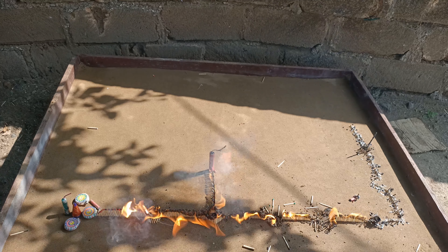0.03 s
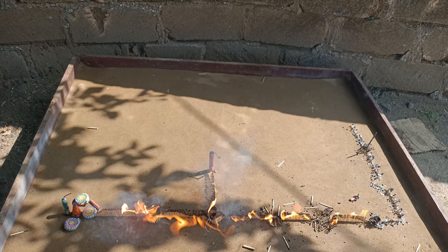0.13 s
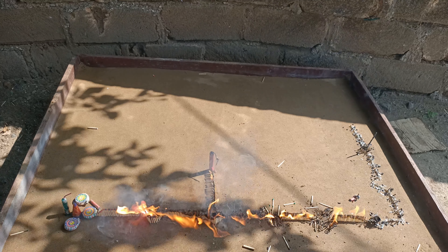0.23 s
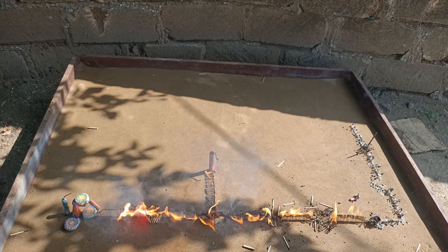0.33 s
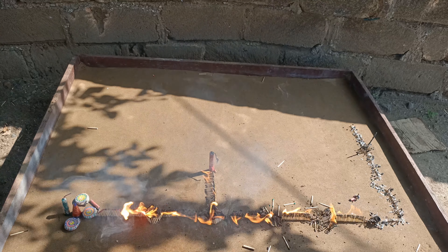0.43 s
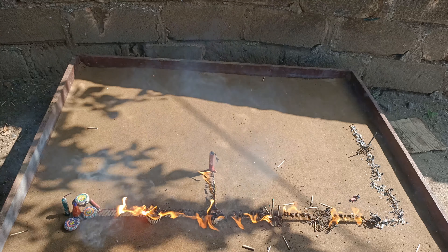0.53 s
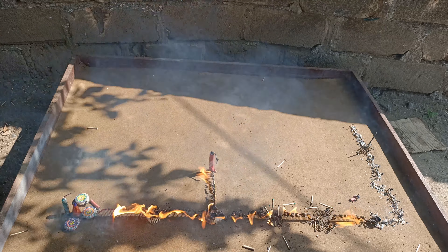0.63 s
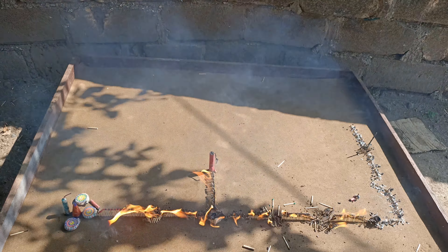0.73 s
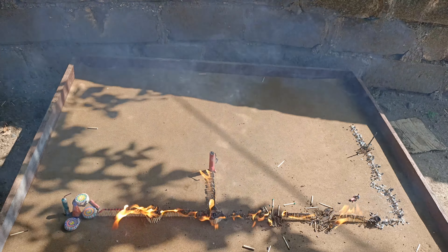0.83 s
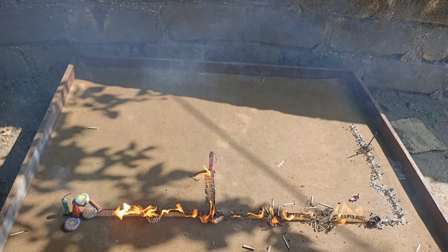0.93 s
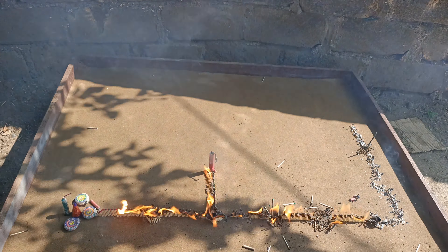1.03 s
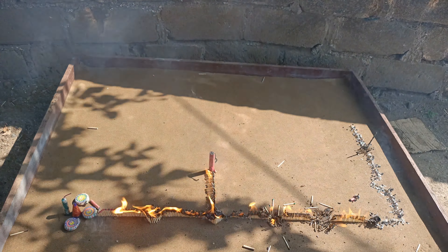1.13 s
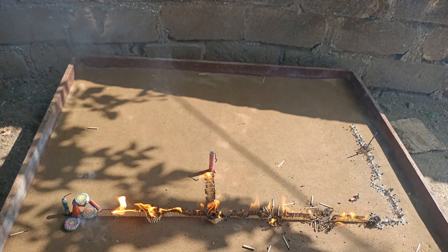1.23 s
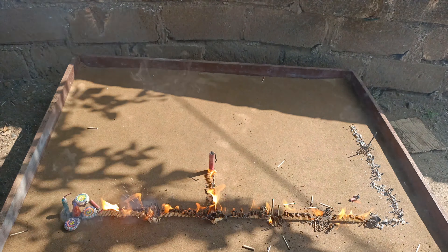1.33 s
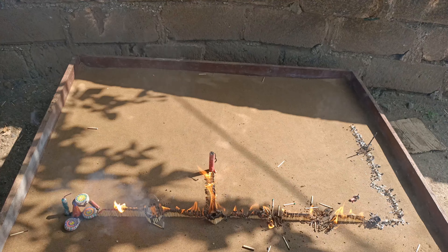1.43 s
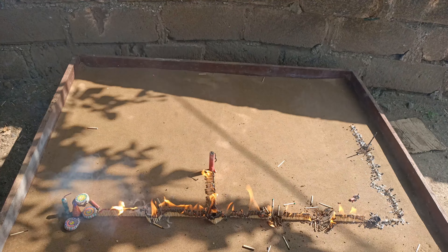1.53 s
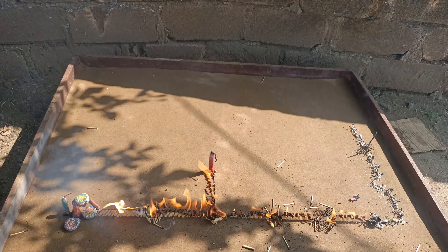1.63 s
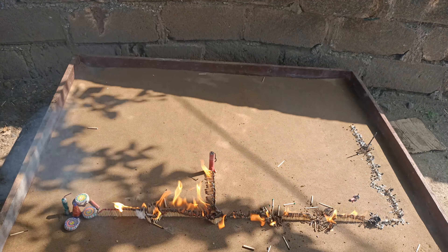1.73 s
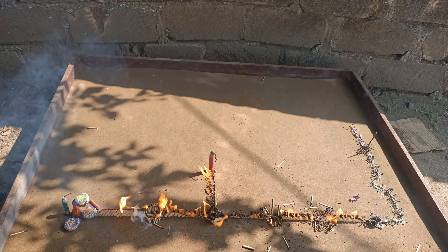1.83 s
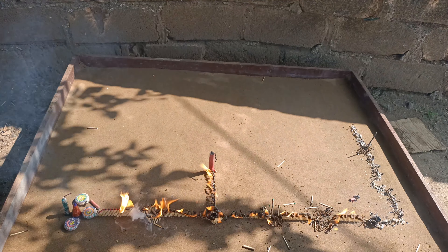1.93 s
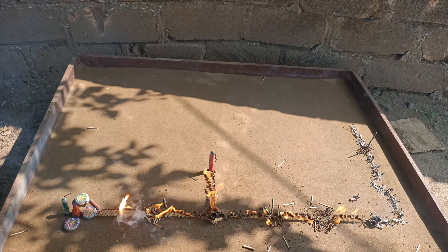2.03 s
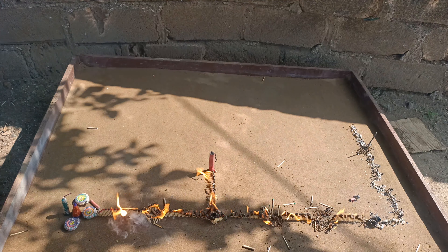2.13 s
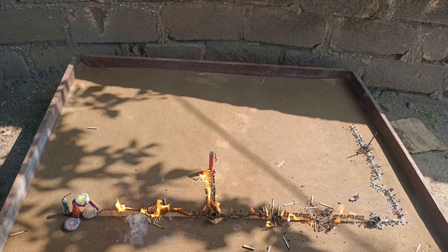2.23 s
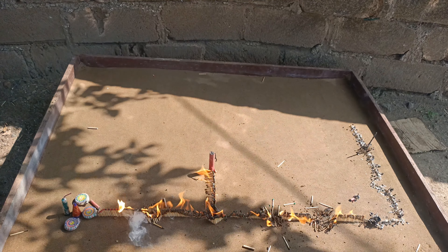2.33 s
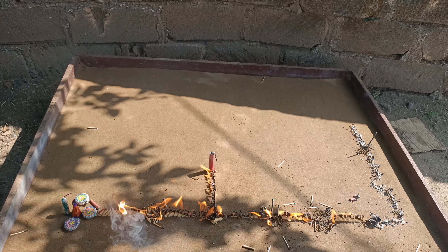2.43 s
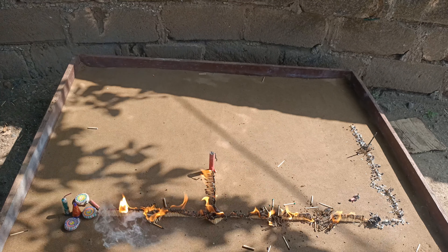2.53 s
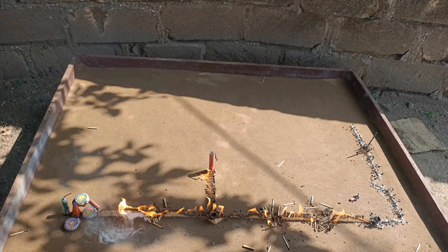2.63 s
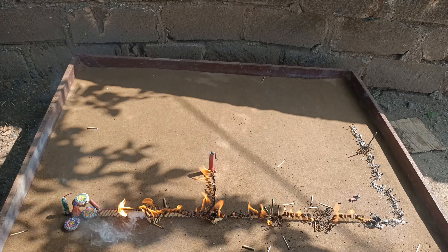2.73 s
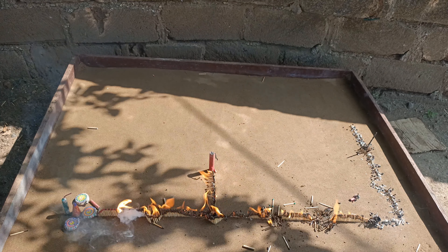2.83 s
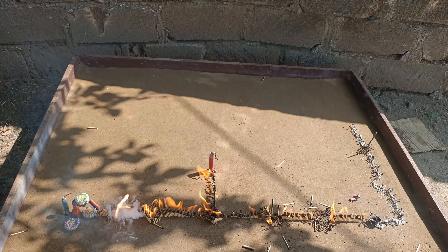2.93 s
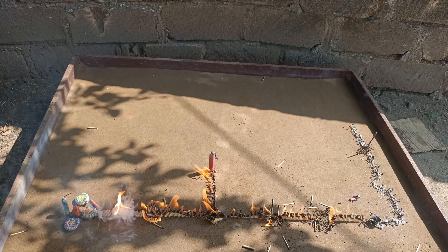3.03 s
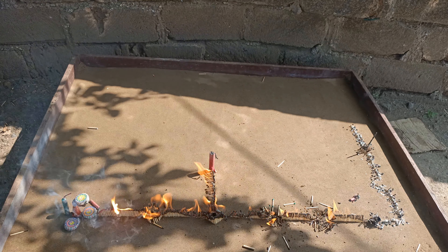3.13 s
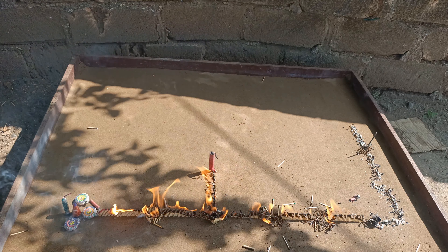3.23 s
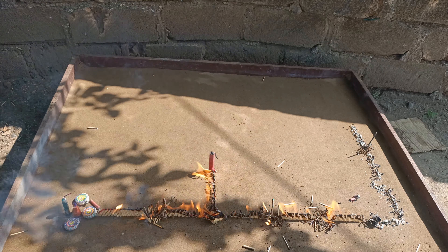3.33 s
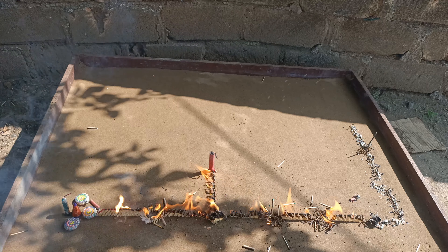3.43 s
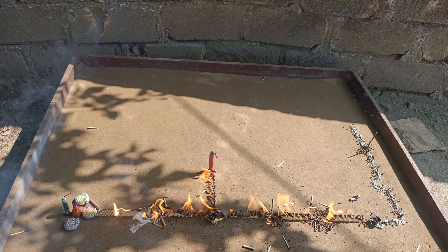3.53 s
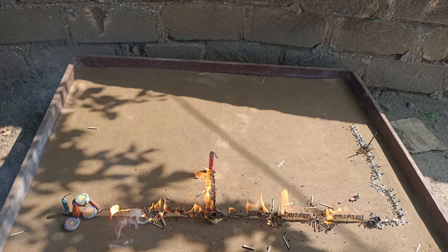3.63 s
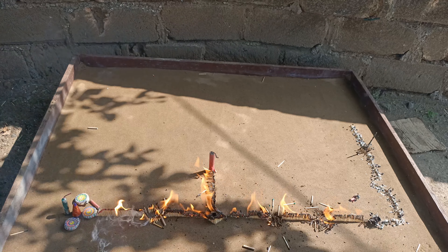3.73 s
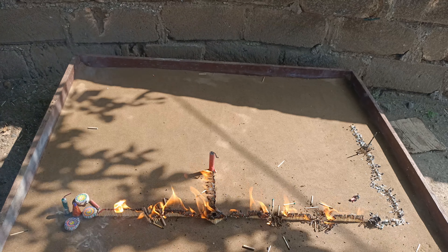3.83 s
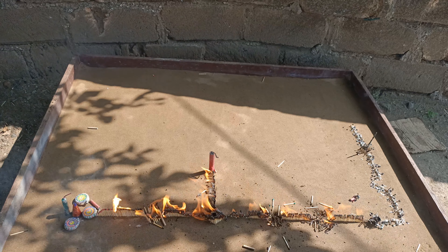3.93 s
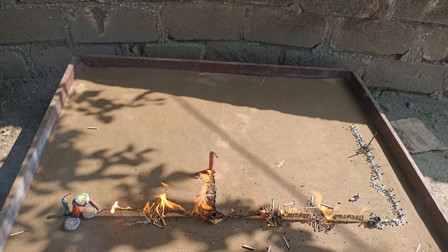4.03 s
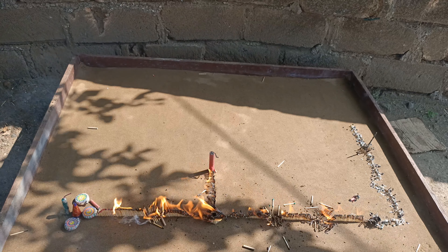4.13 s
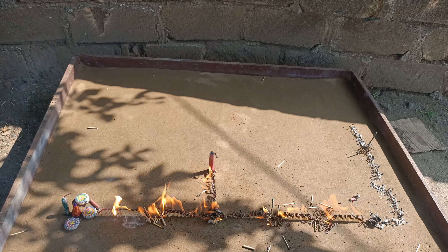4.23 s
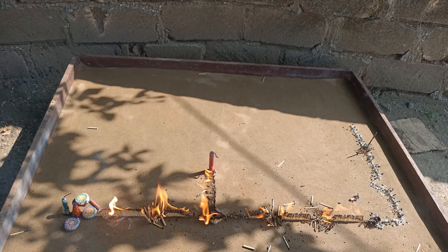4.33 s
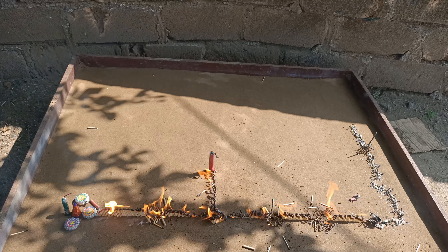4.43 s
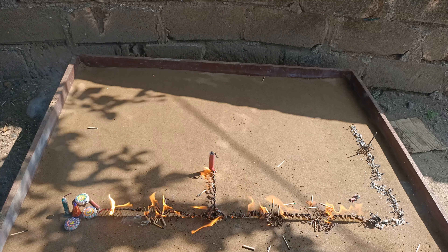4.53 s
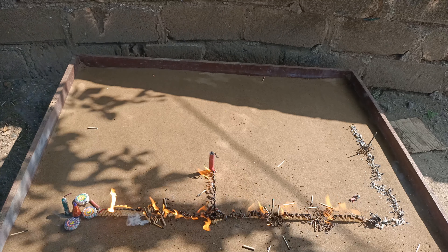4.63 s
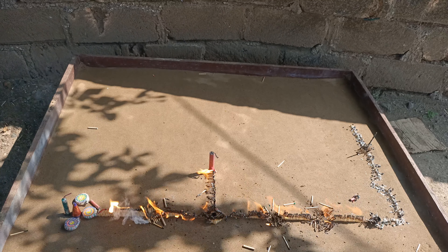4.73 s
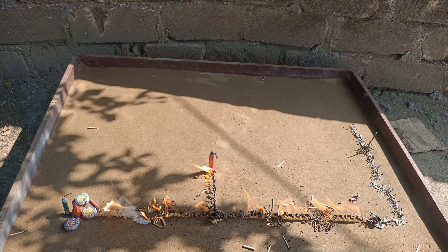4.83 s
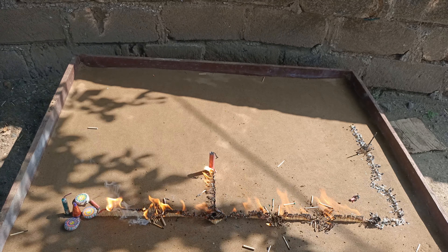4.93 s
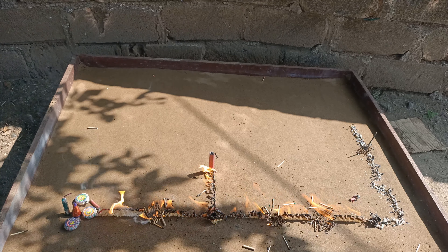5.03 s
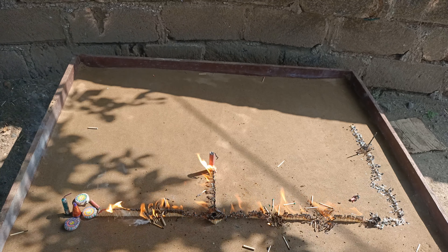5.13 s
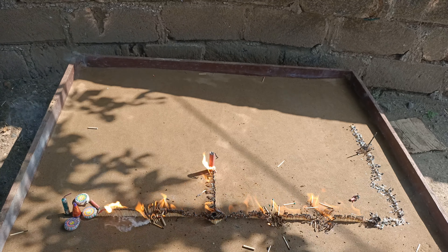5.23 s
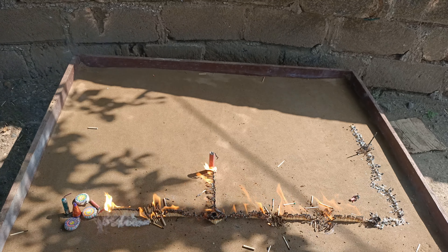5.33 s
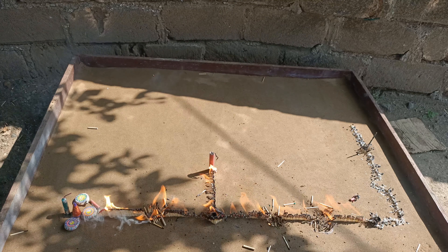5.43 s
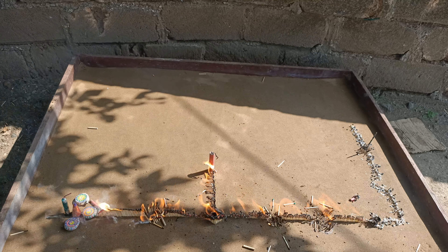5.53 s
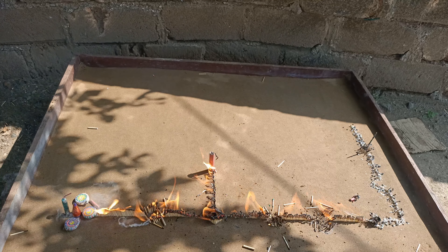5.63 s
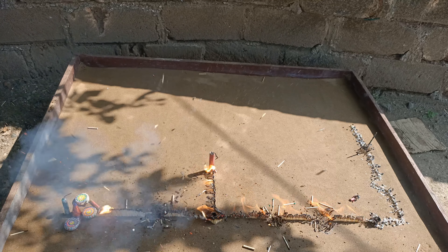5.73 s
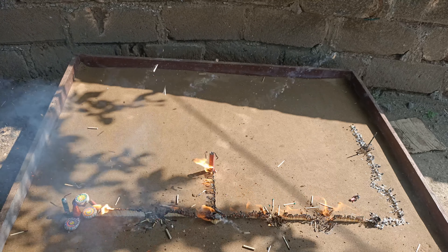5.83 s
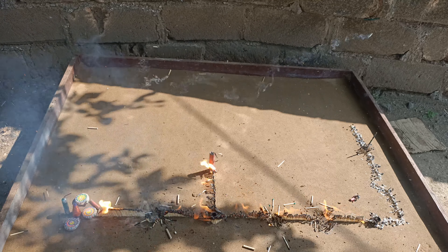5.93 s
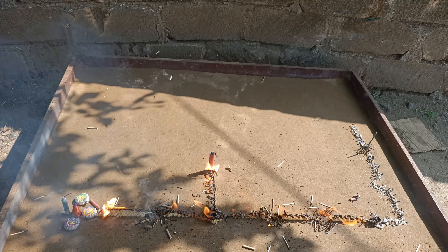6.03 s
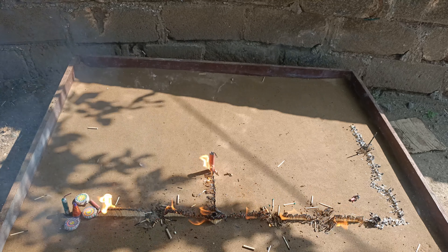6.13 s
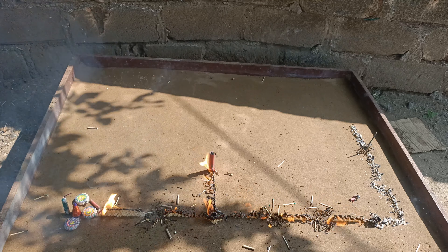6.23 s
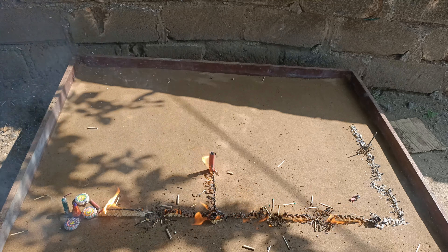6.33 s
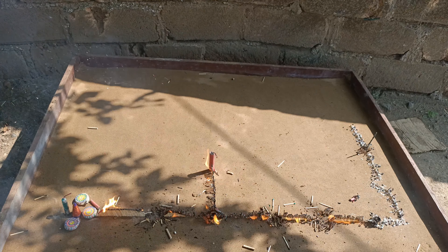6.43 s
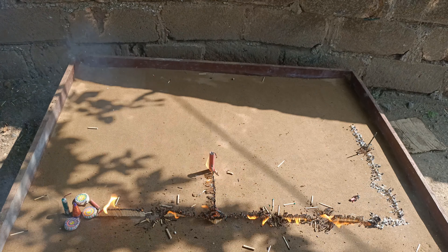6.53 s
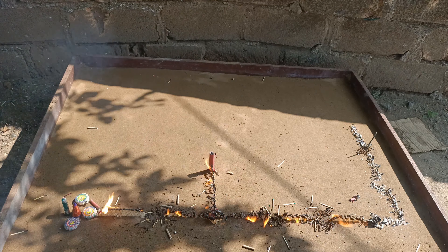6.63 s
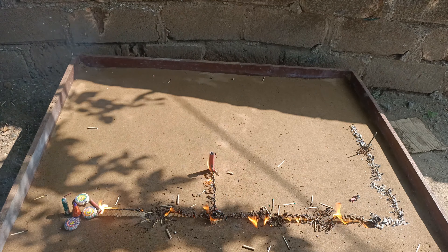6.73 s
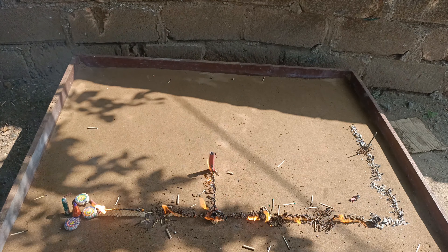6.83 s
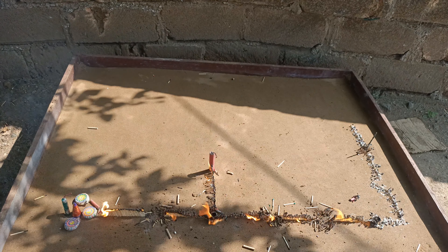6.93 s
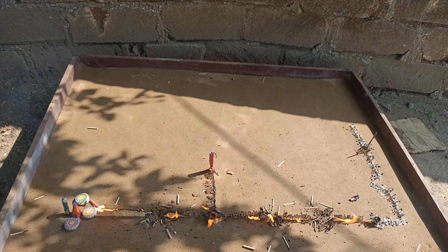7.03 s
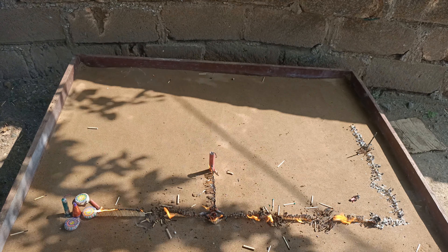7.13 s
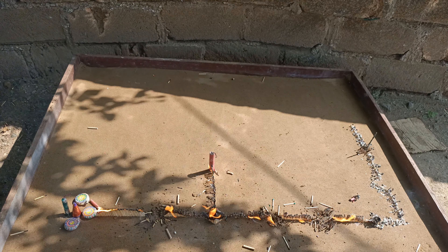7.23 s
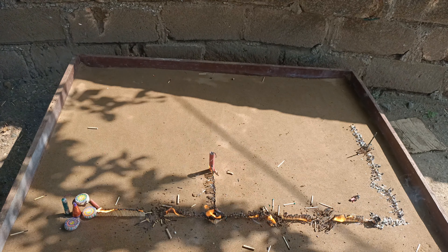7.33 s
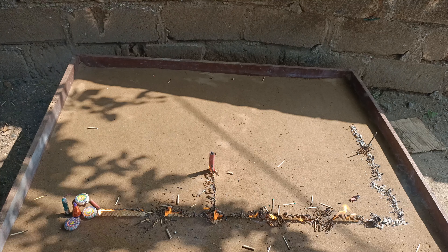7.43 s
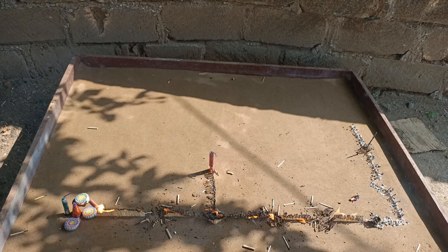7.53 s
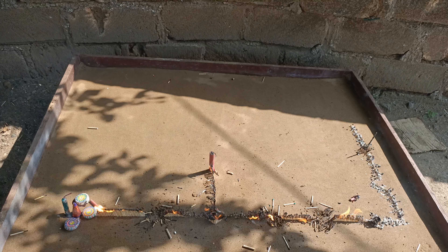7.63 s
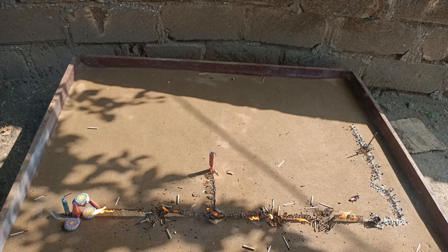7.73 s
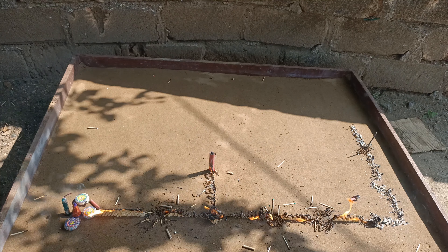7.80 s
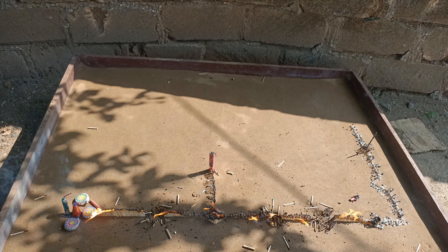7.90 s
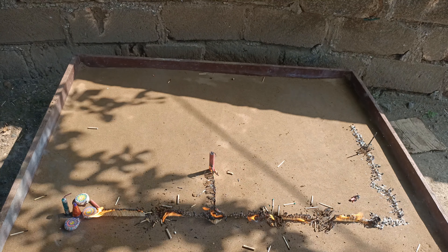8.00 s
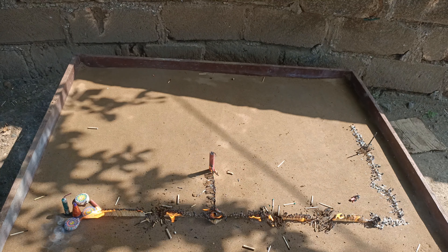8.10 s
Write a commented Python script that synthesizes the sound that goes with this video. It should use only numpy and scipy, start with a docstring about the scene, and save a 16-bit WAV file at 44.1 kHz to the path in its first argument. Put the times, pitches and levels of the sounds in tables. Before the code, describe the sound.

A small match fire burns in a tray in a walled yard, picked up in wide stereo. A brief sputter at 0 s settles into very quiet rushing flames, light hush and a thin shrill of far insects, with short fluttering chirps near 0.5, 1.1 and 2 s. A wind puff bumps at 1.25 s. At 1.4 s a firecracker bangs, full and hard, its echo dying in under half a second; tiny casing clicks follow around 1.55-1.6 s. Soft fizz returns, and powder whooshes gently at 3.1 s. A hollower bang with a bright snap hits at 3.4 s. Fizzing swells from 4.5 to 5.5 s, with low wind puffs after 5.2 s. The third bang, sharp and more echoing, comes at 5.7 s, leaving a faint metallic ring. Weak fizz, flames and breeze continue to 8 s, with more low puffs after 7 s.

```python
"""Match heads flare and fizz over softly rushing flames, in a light breeze with far insects shrilling.
An insect chirps and burning powder jets now and then, while three firecrackers go off in a walled yard.
Flames, fizz, jets and wind are coloured noise under moving levels; chirps are fluttering sine notes.
Each blast is a pressure push, a ringing crack, a noise spit, a thud, a wall rebound and a noise echo.
Bits of casing click down after the first; the last leaves metal ringing. Loud peaks flatten."""
import sys
import numpy as np
from scipy import signal
from scipy.fft import rfft, irfft, next_fast_len
from scipy.io import wavfile
from scipy.ndimage import map_coordinates

SR = 44100
rng = np.random.default_rng(int(sys.argv[2]) if len(sys.argv) > 2 else 0)


def generate_wav(signal):
    """Clip the signal to [-1, 1] and save it as 16-bit WAV at the path in sys.argv[1]."""
    frames = np.transpose(np.atleast_2d(signal))
    scaled = np.clip(frames, -1, 1) * 32767
    pcm = np.round(scaled).astype(np.int16)
    wavfile.write(sys.argv[1], SR, pcm)


N = 360076


def amp(db):
    """Decibels to gain."""
    return 10 ** (np.asarray(db) / 20)


def unit(x):
    """x at rms 1."""
    return x / np.sqrt(np.mean(x ** 2) + 1e-20)


def along(points, hz):
    """Read (frequency [Hz], value) points on a log frequency axis."""
    f, v = np.transpose(points)
    return np.interp(np.log(hz + 1), np.log(f + 1), v)


def curve(rows):
    """One value per sample from (time [s], value) rows."""
    return np.interp(np.arange(N) / SR, *np.transpose(rows))


def wobble(rate, size=N):
    """A smooth random curve through rate random knots a second."""
    knots = rng.standard_normal(int(size * rate / SR) + 4)
    return map_coordinates(knots, [np.arange(size) * rate / SR])


def filtered(x, response):
    """x times a response of frequency."""
    n = x.shape[-1]
    padded = next_fast_len(n + SR // 4)
    hz = np.fft.rfftfreq(padded, 1 / SR)
    return irfft(rfft(x, padded) * response(hz), padded)[..., :n]


def bell(hz, centre_hz, octaves):
    """A bell-shaped band on a log frequency axis."""
    return np.exp(-(np.log2((hz + 1) / centre_hz) / octaves) ** 2 / 2)


def add(track, s, sound):
    """Mix a sound into the track from time s on."""
    start = max(round(s * SR), 0)
    part = sound[..., :N - start]
    track[:, start:start + part.shape[-1]] += part


# how alike left and right are: (frequency [Hz], correlation [-1 to 1])
LEFT_RIGHT_LIKENESS = [(50, 0.027), (150, 1), (300, 0.76), (640, .05), (1400, 0.13), (3000, -0.11),
                       (6000, 0.05), (14000, -0.19)]


def diffuse(spectrum, size=N):
    """Coloured noise of rms 1 from all sides, as two spaced microphones hear it."""
    def mid_side_colour(hz):
        turn = np.arccos(np.clip(along(LEFT_RIGHT_LIKENESS, hz), -1, 1)) / 2
        return amp(along(spectrum, hz)) * [np.cos(turn), np.sin(turn)]
    mid, side = filtered(rng.standard_normal((2, size)), mid_side_colour)
    return unit(np.array([mid + side, mid - side]))


def burn(length):
    """A charge catches, burns evenly and dies away; a longer one does all of it more slowly."""
    catch_share, die_share = 0.28, 0.28  # shares of the burning time
    age = np.arange(int(3 * length * SR)) / (length * SR)
    return np.minimum(age / catch_share, 1) * np.exp(-np.maximum(age - 1, 0) / die_share)


# strength shared by flames and simmer, before their own trims: (time [s], level [dB])
FLAME_STRENGTH = [(0.05, -55), (0.5, -60.5), (0.88, -63), (1.15, -61.5), (2.0, -63), (2.6, -66),
                  (2.95, -59), (3.95, -64), (4.4, -67), (4.58, -61), (5.55, -64), (6.45, -64.5),
                  (7.4, -75.5), (7.65, -64), (8.1, -68.5)]
# relative colour of the flames' rush: (frequency [Hz], level [dB per Hz])
FLAME_COLOUR = [(100, -6), (200, -3.5), (450, 1), (1000, -1), (2000, -5), (3500, -11), (6000, -26.5),
                (15000, -37)]
# relative colour of the fizz: (frequency [Hz], level [dB per Hz])
FIZZ_COLOUR = [(800, -25.5), (2000, -7.5), (3200, -5.5), (4100, -2), (4750, -2), (5300, -1.5), (6500, -10),
               (8000, -14), (10500, -21.5), (13500, -19), (16000, -17.5)]
# clumps of match heads catching, before the sputter:
# (start [s], burning time [s], level [dB], tilt [dB per octave])
MATCH_CLUMPS = [(0, 0.033, -43, -0.5), (0.133, 0.033, -48, 4), (.19, .42, -67, -7), (1, 0.07, -56, -6),
                (1.8, 0.33, -58, 3.5), (2.51, 0.18, -57.5, 0.5), (4.2, 0.13, -58, -0.5),
                (4.52, 0.14, -53, 2.5), (4.779, 0.13, -52.5, -1.5), (4.87, 0.59, -52.5, 0),
                (5.99, 0.33, -57, 0.5), (6.58, 0.13, -63.5, 3), (7.57, 0.48, -65, 0)]


def fire(flicker_db=3.04, sputter_db=0.85, crackle_db=1.5, pivot_hz=4500):
    """Flames rush softly and simmer while clumps of match heads flare with a sputtering fizz."""
    flame_trim_db, simmer_trim_db = 3, -0.5  # over the shared strength
    strength_db = curve(FLAME_STRENGTH)
    flame = amp(strength_db + flame_trim_db + flicker_db * wobble(14)) * diffuse(FLAME_COLOUR)
    fizz = amp(strength_db + simmer_trim_db) * diffuse(FIZZ_COLOUR)
    for s, length, db, tilt_db in MATCH_CLUMPS:
        swell = burn(length)
        colour = [(hz, level + tilt_db * np.log2(hz / pivot_hz)) for hz, level in FIZZ_COLOUR]
        add(fizz, s, amp(db) * swell * diffuse(colour, size=len(swell)))
    sputter = amp(sputter_db * wobble(30) + crackle_db * wobble(400))
    return flame + sputter * fizz


# relative colour of the outdoor hush, also the raw noise of the jets:
# (frequency [Hz], level [dB per Hz])
AIR_COLOUR = [(12, -14.5), (30, 3), (90, -7.5), (150, -4.5), (270, -20.5), (445, -17.5), (1020, -24.5),
              (2060, -23.5), (4100, -23.5), (5300, -24), (7900, -38.5), (15500, -34.5)]
# relative colour of eddies at the microphones: (frequency [Hz], level [dB per Hz])
BUFFET_COLOUR = [(10, -20.5), (25, 1.5), (55, 5.5), (100, -6), (160, -16), (280, -35), (600, -67.5)]
# the strongest puffs of air: (middle [s], level [dB], left minus right [dB])
AIR_PUFFS = [(1.249, -37.5, 11.5), (1.358, -45, 12), (5.195, -40.5, 1.5), (5.411, -46.5, 9.5),
             (5.502, -44.5, -2), (7.01, -46.5, -2), (7.129, -46.5, 2), (7.779, -43, -5.5),
             (7.931, -40, -11.5), (8.039, -43.5, -14)]


def breeze(hush_db=-56.0, gusty_db=4.0, half_puff_s=0.068):
    """Low puffs of air at the microphones over small random eddies and the steady outdoor hush."""
    eddy_db, freshening_db_per_s = -64.5, 1.34  # level at the start, slow rise of the breeze
    wind_db = eddy_db + freshening_db_per_s * np.arange(N) / SR + gusty_db * wobble(14)
    out = amp(hush_db) * diffuse(AIR_COLOUR) + amp(wind_db) * diffuse(BUFFET_COLOUR)
    swell = np.hanning(int(2 * half_puff_s * SR))
    for s, db, pan_db in AIR_PUFFS:
        # each port feels its own eddies
        noise = rng.standard_normal((2, len(swell)))
        eddies = unit(filtered(noise, lambda hz: amp(along(BUFFET_COLOUR, hz))))
        side_db = db + np.array([[pan_db], [-pan_db]]) / 2
        add(out, s - half_puff_s, amp(side_db) * swell * eddies)
    return out


def far_insects(centre_hz=5250, octaves=0.09, db=-71, surge_db=3.0):
    """Distant insects merge into a thin shrill band of noise whose level surges and sinks."""
    shrill = unit(filtered(rng.standard_normal((2, N)), lambda hz: bell(hz, centre_hz, octaves)))
    return amp(db + surge_db * wobble(8.6)) * shrill


# insect notes: (start [s], length before the fall [s], base pitch [Hz], level before echoes [dB])
INSECT_CHIRPS = [(0.23, 0.04, 4700, -52), (0.554, 0.09, 4735, -43.5), (0.659, 0.036, 5030, -60),
                 (0.745, 0.076, 4580, -59.5), (0.906, 0.053, 4680, -60.5), (1.061, .065, 4700, -47.5),
                 (1.199, 0.032, 4650, -53), (1.885, 0.035, 4850, -54), (1.963, 0.035, 4780, -46.5),
                 (2.059, 0.076, 4657, -46), (2.146, 0.043, 4725, -46.5), (3.358, 0.017, 4980, -28.5),
                 (3.69, 0.026, 4860, -59)]


def insect(waver=0.01, overtone_db=-28, flutter_db=3.5, wet=0.74):
    """Short fluttering notes that arch in pitch, smeared by their own echoes."""
    rise_s, fall_s = 0.02137, 0.014
    arch_share = 0.012  # the pitch rises by this share and sinks again
    song, t = np.zeros((2, N)), np.arange(SR // 2) / SR
    for s, length, hz, db in INSECT_CHIRPS:
        swell = np.minimum(t / rise_s, 1) * np.exp(-np.maximum(t - length, 0) / fall_s)
        arch = arch_share * np.sin(np.pi * np.minimum(t / length, 1))
        pitch_hz = hz * (1 + arch + waver * wobble(100, size=len(t)))
        phase = 2 * np.pi * np.cumsum(pitch_hz) / SR
        flutter = unit(amp(flutter_db * wobble(220, size=len(t))))
        note = np.sin(phase) + amp(overtone_db) * np.sin(2 * phase)
        add(song, s, amp(db) * swell * flutter * note)
    walls = rng.standard_normal((2, len(t))) * amp(-60 * t / 0.42)  # echoes with a 0.42 s t60
    walls /= np.linalg.norm(walls[0])
    return song + wet * signal.fftconvolve(song, walls, axes=1)[:, :N]


# jets of burning powder: (start [s], burning time [s], centre [Hz], width [octaves], level [dB])
POWDER_JETS = [(.27, .35, 2940, .11, -62), (3.09, .29, 650, 0.97, -48.5), (4.79, .06, 3920, 0.19, -55)]


def flares():
    """Powder catches and jets for a moment: a soft whoosh when wide, a thin hiss when narrow."""
    out = np.zeros((2, N))
    for s, length, centre_hz, octaves, db in POWDER_JETS:
        swell = burn(length)
        air = diffuse(AIR_COLOUR, size=len(swell))
        jet = unit(filtered(air, lambda hz: bell(hz, centre_hz, octaves)))
        add(out, s, amp(db) * swell * jet)
    return out


def pulse(t, life):
    """A pulse that rises to 1 at its life [s] and then fades."""
    return t / life * np.exp(1 - t / life)


def blast(colour, push_db, crack_hz, crack_life, crack_db, spit_db, wall_db, push_life=0.0014,
          wall_delay=0.0044, port_lag=0.00011, thud_hz=400, thud_db=-11, thud_life=0.0035):
    """The casing cracks, gas spits and pushes the air, the tray thuds; a wall throws blast back."""
    t = np.arange(SR // 10) / SR
    push = amp(push_db) * pulse(t, push_life) ** 4  # a short overpressure
    crack = amp(crack_db) * np.sin(2 * np.pi * crack_hz * t) * pulse(t, crack_life) ** 2
    spit = amp(spit_db) * pulse(t, 0.0014) * diffuse(colour, size=len(t))
    thud = amp(push_db + thud_db) * np.sin(2 * np.pi * thud_hz * t) * pulse(t, thud_life)
    # the wave front reaches the left port first
    lags = np.array([[0], [port_lag]])
    front = filtered(push + crack, lambda hz: np.exp(-2j * np.pi * hz * lags))
    direct = front + spit

    def wall(hz):
        duller = 1 / (1 + 1j * hz / 2600)
        thinner = 1j * hz / (1j * hz + 110)
        return np.exp(-2j * np.pi * hz * wall_delay) * duller * thinner
    # the rebound comes back upside down
    return direct + thud - amp(wall_db) * filtered(direct, wall)


# decay of the yard before each blast's stretch: (frequency [Hz], t60 [s])
YARD_DECAY = [(60, 0.62), (220, 0.64), (600, 0.42), (1500, 0.42), (3500, 0.42), (7000, 0.33), (14000, 0.16)]
# paths between the yard's walls: (delay [s], strength [gain])
WALL_PATHS = [(.0021, 0.13), (.0048, .18), (.0097, .15), (0.0276, .17)]


def yard_echo(colour, build, build_db, stretch, bass_build_db=9, far_db=-23.5, far_t60=1.0,
              lumpy_db=1.37):
    """Echoes pile up, the bass last, then die by band; far buildings leave a weak longer tail."""
    comb = lambda hz: 1 + sum(gain * np.exp(-2j * np.pi * hz * delay) for delay, gain in WALL_PATHS)
    echoes = unit(filtered(diffuse(colour, size=2 * SR), comb)[:, SR:])
    hz, t, bands = signal.stft(echoes, SR, nperseg=256)
    hz = hz[:, None]
    early, late = np.maximum(1 - t / build, 0), np.maximum(t - build, 0)
    swell = amp(-early * (build_db + bass_build_db / (1 + (hz / 800) ** 2)))
    near = amp(-60 * late / (stretch * along(YARD_DECAY, hz)))
    far = amp(far_db - 60 * late / far_t60) / (1 + (hz / 6000) ** 2)
    shaped = bands * swell * np.hypot(near, far)
    tail = signal.istft(shaped, SR, nperseg=256)[1][:, :SR]
    soft_start = 1 - np.exp(-np.arange(SR) / SR / 0.001)
    return tail * amp(lumpy_db * wobble(450, size=SR)) * soft_start


# firecrackers: (time [s], push [dB], suction [dB], suction life [s], crack [dB], crack pitch [Hz],
# crack life [s], spit [dB], wall rebound [dB], echo [dB], echo build-up [s],
# echo build-up [dB], decay stretch [factor])
FIRECRACKERS = [(1.4229, -6.5, -23.5, .035, 2, 1140, .00065, -11.5, -6.5, -15, 0.064, 0.5, 0.61),
                (3.3818, 2.5, -29.5, .011, -1, 4500, 0.00038, -3, -6.5, -19, 0.055, -4, 0.82),
                (5.7289, -12, -20, .004, -11.5, 3300, .0013, -11, -1, -8, .028, 0, 1.35)]
# relative colour of the first, second and third blast: (frequency [Hz], level [dB per Hz])
FULL_BLAST = [(30, -3), (90, -14.5), (160, -10.5), (250, 5), (360, -7.5), (450, 1.5), (600, -0.5),
              (1100, -4.5), (2500, -2.5), (4100, -2.5), (5200, -11.5), (7000, -24.5), (9000, -29),
              (15500, -28.5)]
HOLLOW_BLAST = [(30, -2), (100, 0), (260, 8.5), (360, -1), (450, 5), (800, -3.5), (1300, -16), (2200, -7),
                (3100, -11.5), (4400, -3.5), (5300, -9), (7000, -21), (9500, -28), (14000, -20)]
SHARP_BLAST = [(45, -2.5), (120, -5.5), (260, 2), (360, -3.5), (460, -0.5), (1100, -4), (1900, -2),
               (2800, 3), (4200, -1), (5600, -7), (8000, -16.5), (10500, -19), (15500, -17)]


def firecrackers():
    """Every bang is a direct blast, a weak suction after it, and the yard's answer."""
    out, t = np.zeros((2, N)), np.arange(SR // 2) / SR
    for row, colour in zip(FIRECRACKERS, (FULL_BLAST, HOLLOW_BLAST, SHARP_BLAST)):
        s, push_db, suction_db, suction_life, crack_db, crack_hz, crack_life = row[:7]
        spit_db, wall_db, echo_db, build, build_db, stretch = row[7:]
        add(out, s, blast(colour, push_db, crack_hz, crack_life, crack_db, spit_db, wall_db))
        add(out, s, -amp(suction_db) * pulse(t, suction_life) ** 2)
        add(out, s, amp(echo_db) * yard_echo(colour, build, build_db, stretch))
    return out


# falling bits of casing, before the trace of yard: (time [s], level [dB])
CASING_TICKS = [(1.5483, -27.5), (1.57, -30), (1.6055, -34)]


def ticks(t60=0.015, ring_db=-20, ring_t60=0.7):
    """Bits of casing land on the tray: tiny bright clicks of noise with a trace of the yard."""
    out, t = np.zeros((2, N)), np.arange(SR // 5) / SR
    colour = [(800, -6), (4000, 14), (8000, -5.5), (15000, -6.0)]  # (frequency [Hz], level [dB per Hz])
    fade = amp(-60 * t / t60) + amp(ring_db - 60 * t / ring_t60)
    for s, db in CASING_TICKS:
        add(out, s, amp(db) * fade * diffuse(colour, size=len(t)))
    return out


def metal_ring(hz=808, db=-58.5, t60=3.5):
    """The last blast leaves some nearby metal ringing faintly: a fading sine of wavering phase."""
    out, t = np.zeros((2, N)), np.arange(2 * SR) / SR
    tone = np.sin(2 * np.pi * hz * t + 0.6 * wobble(17, size=len(t)))
    add(out, FIRECRACKERS[-1][0], amp(db - 60 * t / t60) * tone)
    return out


def scene():
    """Everything in the yard."""
    burning = fire() + flares()
    outdoors = breeze() + far_insects() + insect()
    bangs = firecrackers() + ticks() + metal_ring()
    return burning + outdoors + bangs


def record(dry, top_hz=15900):
    """The blasts flatten against full scale; a steep filter removes what lies above the band limit."""
    clipped = dry / (1 + np.abs(dry) ** 8) ** (1 / 8)
    return filtered(clipped, lambda hz: 1 / (1 + (hz / top_hz) ** 160))


dry = scene()
out = record(dry)
generate_wav(out)
```